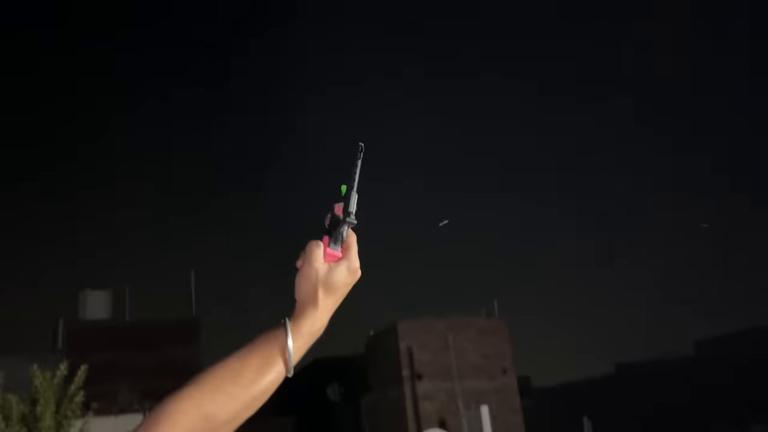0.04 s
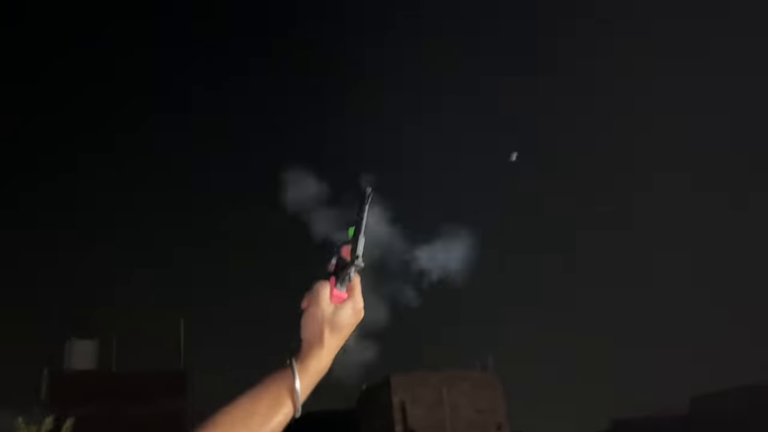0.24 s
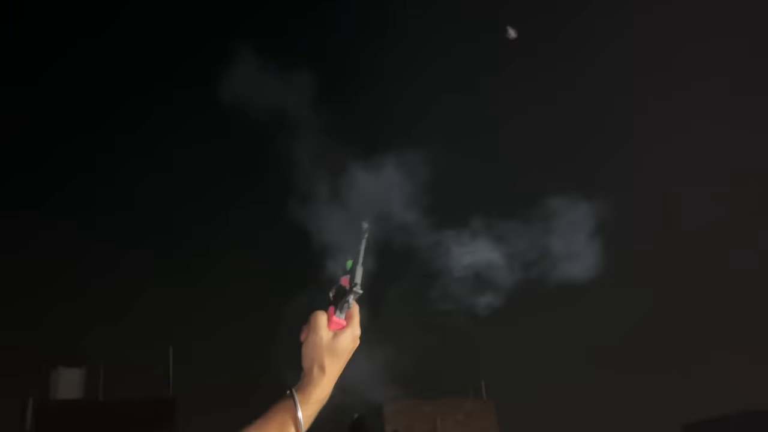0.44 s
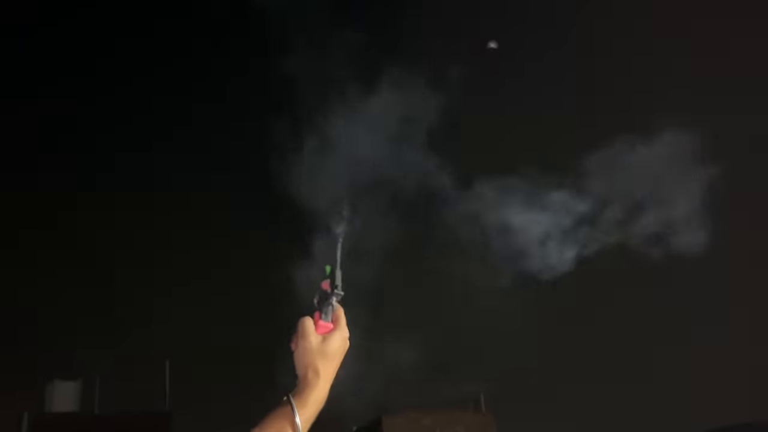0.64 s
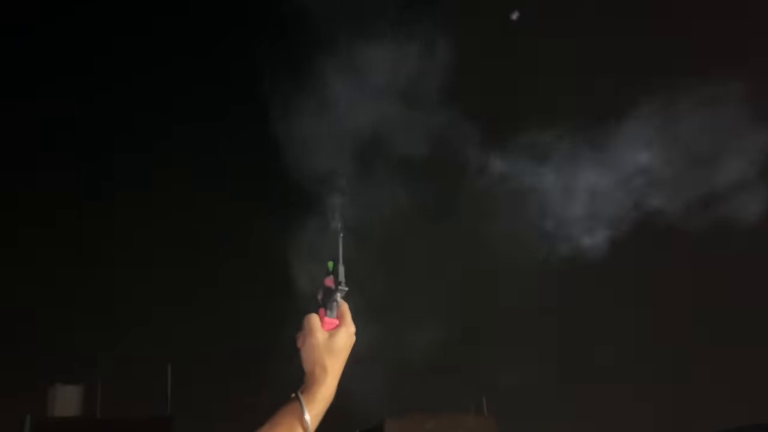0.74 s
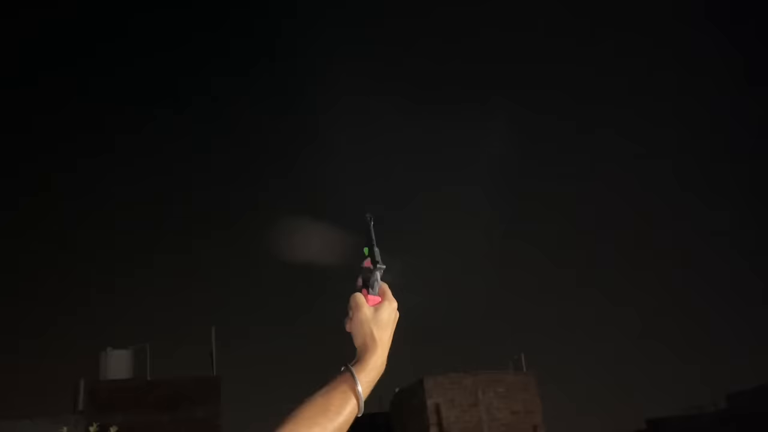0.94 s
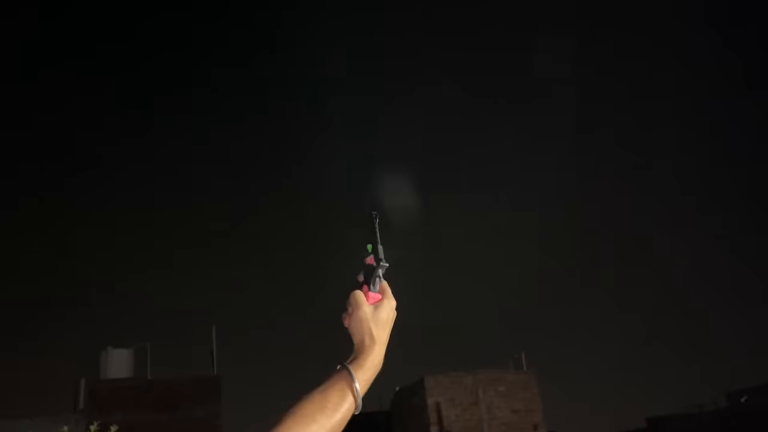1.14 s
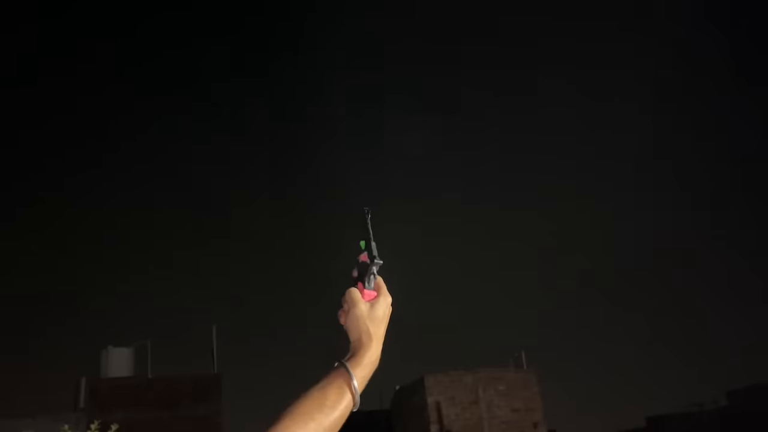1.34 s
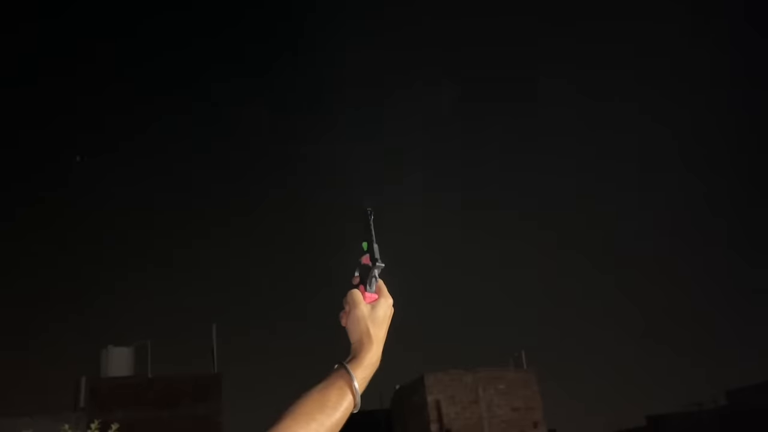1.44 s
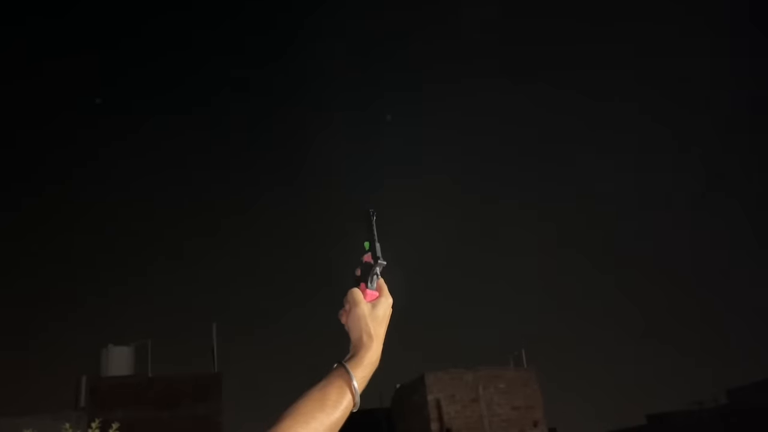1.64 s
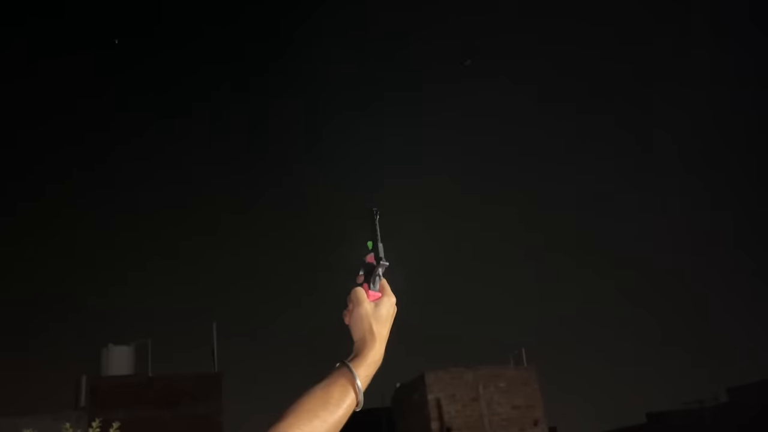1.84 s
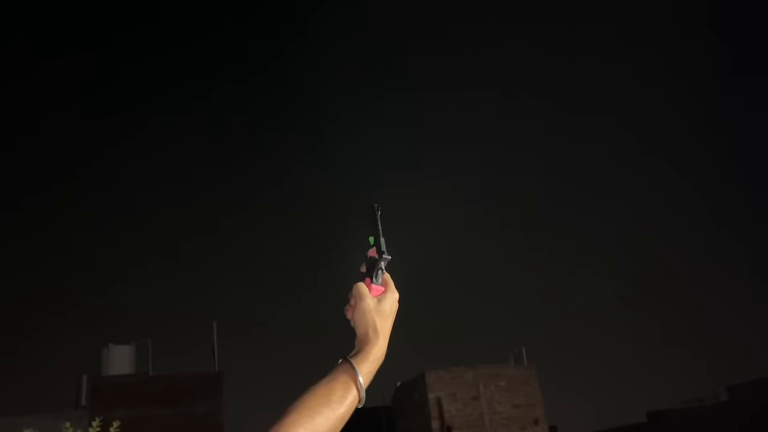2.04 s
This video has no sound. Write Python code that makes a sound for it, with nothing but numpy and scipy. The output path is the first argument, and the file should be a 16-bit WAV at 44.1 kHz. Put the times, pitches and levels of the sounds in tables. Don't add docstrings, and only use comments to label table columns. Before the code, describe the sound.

One sharp cap gun crack echoes off houses, followed by three hard plastic hammer clicks.

```python
import sys
import numpy as np
from scipy import signal
from scipy.fft import rfft, irfft, next_fast_len
from scipy.io import wavfile
from scipy.ndimage import map_coordinates

SR = 44100
rng = np.random.default_rng(int(sys.argv[2]) if len(sys.argv) > 2 else 0)


def elevation(decibels):
    levels = np.asarray(decibels, float)
    return 10 ** (levels / 20)


def output_pcm(signal):
    pcm = np.clip(np.atleast_2d(signal).T, -1, 1) * 32767
    wavfile.write(sys.argv[1], SR, np.round(pcm).astype(np.int16))


N = 92610


def along(points, hz):
    f, v = np.transpose(points)
    return np.interp(np.log(hz + 1), np.log(f + 1), v)


def level(rows):
    s, db = np.transpose(rows)
    return elevation(np.interp(np.arange(N) / SR, s, db))


def unit(x):
    return x / np.sqrt(np.mean(x ** 2) + 1e-20)


def wobble(rate):
    knots = rng.standard_normal(int(N * rate / SR) + 4)
    return map_coordinates(knots, [np.arange(N) * rate / SR])


def filtered(x, response):
    m = next_fast_len(len(x) + 4096)
    return irfft(rfft(x, m) * response(np.fft.rfftfreq(m, 1 / SR)), m)[:len(x)]


def butter(x, hz, kind, order):
    sos = signal.butter(order, min(hz, SR * .49), kind, fs=SR, output='sos')
    return signal.sosfilt(sos, x)


def body(peaks):
    def response(f):
        return sum((-1) ** k * elevation(db) * 1j * f * w / (c * c - f * f + 1j * f * w)
                   for k, (c, w, db) in enumerate(peaks))
    return response


def noise(spectrum):
    return unit(filtered(rng.standard_normal(N), lambda hz: elevation(along(spectrum, hz))))


def blows(rows, peaks):
    x = np.zeros(N)
    for s, db in rows:
        x[round(s * SR)] = elevation(db)
    one_blow = filtered(np.eye(1, 2048)[0], body(peaks))
    return filtered(x, body(peaks)) / np.abs(one_blow).max()


def snaps(rows, wide, air_db, air_hz, lead):
    out, t = np.zeros(N + SR), np.arange(SR // 20) / SR
    for s, db, hz, t60 in rows:
        uneven_decay = elevation(2.05 * rng.standard_normal(len(t)) - 60 * t / t60)
        raw = rng.standard_normal(len(t)) * uneven_decay
        raw[0] = lead
        band = body([(hz, wide * hz, 0)])

        def colour(f):
            air = 1j * f / (900 + 1j * f) / (1 + 1j * f / air_hz) ** 3
            return band(f) ** 2 + elevation(air_db) * air
        x = filtered(raw, colour)
        out[round(s * SR):][:len(t)] += elevation(db) * x / np.abs(x).max()
    return out[:N]


def roof(x):
    # (frequency [Hz], t60 [s])
    roof_t60 = [(600, 0.28), (2000, 0.53), (5000, 0.54), (9000, 0.49), (12000, 0.21), (16000, 0.22)]
    hz, t, z = signal.stft(rng.standard_normal(SR), SR, nperseg=256)
    dying = z * elevation(-60 * t / along(roof_t60, hz)[:, None])
    tail = signal.istft(dying, SR, nperseg=256)[1]
    return signal.fftconvolve(np.pad(x, (300, 0)), tail / np.linalg.norm(tail))[:N]


def street():
    # (frequency [Hz], density [dB per Hz])
    traffic_colour = [(25, -16.5), (60, 0.5), (140, -3.5), (300, -9), (1000, -14.5), (2200, -25),
                      (3400, -30), (6000, -59), (12000, -60.5), (16000, -102.5)]
    # (frequency [Hz], level [dB])
    engine = [(58, -57.5), (118, -63.5), (178, -71)]
    # (time [s], level [dB])
    rustle_level = [(0, -41), (.03, -50), (.06, -57.5), (.11, -49.5), (.15, -59), (.19, -63.5),
                    (.25, -91.5)]
    # (frequency [Hz], density [dB per Hz])
    rustle_colour = [(240, -40.5), (400, -5.5), (504, -17), (1380, -10), (2050, -11.5), (2710, -12.5),
                     (9470, -21), (16000, -34.5)]
    # (time [s], level [dB])
    insect_level = [(0, -65.5), (.95, -68), (1.15, -67), (1.25, -70), (1.42, -59), (1.6, -69.5),
                    (1.75, -69.5), (2.1, -74)]
    # (time [s], level [dB])
    whine_level = [(0, -93), (1.8, -75), (1.95, -61), (2.1, -61)]
    insect_hz, whine_hz = 3160, 905
    t = np.arange(N) / SR
    traffic = elevation(-51 + 1.97 * wobble(7.11)) * noise(traffic_colour)
    hum = np.zeros(N)
    for hz, db in engine:
        loudness = elevation(db + 4.6 * wobble(10.98)) * np.sqrt(2)
        hum += loudness * np.sin(2 * np.pi * hz * t + 1.9 * wobble(6.7))
    rustle = noise(rustle_colour) * level(rustle_level) * elevation(1.2 * wobble(53))
    insect = level(insect_level) * elevation(1.9 * wobble(7.9))
    insect = insect * np.sin(2 * np.pi * insect_hz * t + .6 * wobble(37))
    whine = level(whine_level) * np.sin(2 * np.pi * whine_hz * t + .8 * wobble(21))
    return traffic + hum + rustle + insect + whine


def trigger():
    # (time [s], peak [dB], centre [Hz], t60 [s])
    clicks = [
        (1.1699, -22.5, 5500, 0.012),
        (1.398, -39.5, 6940, 0.052),
        (1.5975, -16, 5100, 0.011),
        (1.617, -37, 5800, .015),
        (1.7774, -40, 5960, 0.07),
        (1.9784, -17.5, 4940, 0.01),
    ]
    # (frequency [Hz], width [Hz], level [dB])
    latch = [(1110, 400, 0), (2930, 280, -9.5), (3970, 300, 0.5), (5800, 460, 5), (10130, 350, -7)]
    # (time [s], peak [dB], centre [Hz], t60 [s])
    spring_ticks = [(1.119, -39, 2150, 0.02), (1.1385, -35, 3460, .015), (1.161, -30, 3500, 0.012),
                    (1.165, -40, 5000, .02), (1.188, -38, 5850, 0.02), (1.2, -42, 8000, .02),
                    (1.3285, -48, 2600, 0.016), (1.59, -34, 3500, 0.051), (1.593, -40, 6500, 0.017),
                    (1.63, -43, 5500, .02), (1.652, -44, 8000, 0.0147), (1.7201, -35.5, 3180, 0.024),
                    (1.971, -29.5, 3350, 0.025), (1.998, -39, 4000, 0.024), (2.031, -44, 7050, 0.011),
                    (2.0468, -39.5, 2870, .02)]
    snap = snaps(clicks, wide=1.1, air_db=6.5, air_hz=16000, lead=1.24)
    ring = filtered(snap, body(latch))
    release = butter(elevation(-4.5) * snap + elevation(1.5) * ring, 1900, 'high', order=3)
    springs = snaps(spring_ticks, wide=0.54, air_db=-28, air_hz=9000, lead=1.5)
    x = release + butter(springs, 8300, 'low', order=5)
    return x + elevation(-19) * roof(x)


def wall_return():
    # (time [s], peak [dB])
    returns = [
        (1.0887, -28),
        (1.5347, -25),
        (1.9095, -29),
    ]
    # (frequency [Hz], width [Hz], level [dB])
    return_peaks = [(2220, 310, 4.5), (1120, 290, -7), (4670, 450, -2.5)]
    contacts = ((0, -4.5), (.0009, 3), (.003, -8))  # (delay [s], level [dB])
    rows = [(s + delay, db + k) for s, db in returns for delay, k in contacts]
    return butter(blows(rows, return_peaks), 7100, 'low', order=5)


def hammer():
    # (time [s], level [dB])
    falls = [
        (0.9642, -6),
        (1.4167, -4),
        (1.796, -4),
    ]
    # (time after the fall [s], level [dB], centre [Hz], t60 [s])
    contacts = [(-.002, -19, 5600, 0.02), (0, -2, 3750, 0.025), (.0011, -7, 4100, 0.014),
                (.0036, 1.5, 5080, 0.01), (.0047, -4.5, 5070, 0.011), (.0060, -1, 3500, 0.0062),
                (.0098, -9.5, 2600, 0.022), (0.0128, -13.5, 4530, 0.029), (0.0225, -9.5, 2640, 0.038),
                (0.024, -11, 5200, 0.039), (.029, -19, 3000, .028), (0.033, -13, 5050, .02),
                (.035, -15.5, 8330, 0.021), (.0365, -21.5, 3500, 0.023), (.065, -23.5, 4960, .025)]
    # (time after the fall [s], level [dB], centre [Hz], t60 [s])
    far_wall = [(0.122, -35.5, 3500, 0.035), (.127, -29.5, 3500, 0.057), (.131, -35.5, 4970, 0.036),
                (.139, -32.5, 2330, .03), (.155, -35.5, 4000, .02)]
    # (frequency [Hz], width [Hz], level [dB])
    frame = [(604, 190, -12.5), (995, 63, 7), (1260, 184, 4), (2610, 140, 7), (3500, 174, 5.5),
             (4070, 210, 3), (4960, 320, 5.5), (5360, 130, 3.5), (5896, 160, 3), (7210, 240, 3),
             (8420, 840, -5), (11000, 460, -5.5)]
    # (frequency [Hz], width [Hz], level [dB])
    roof_colour = [(2600, 230, 8), (3500, 910, 2.5), (3480, 83, 12.5), (4910, 166, 7), (7500, 9100, -0.5)]
    scene_change_s = .9735
    out = np.zeros(N)
    for s, db in falls:
        rows = [(s + delay, db + k + rng.normal(0, 1.1), hz, t60)
                for delay, k, hz, t60 in contacts + far_wall]
        near, late = rows[:len(contacts)], rows[len(contacts):]
        grit = butter(snaps(near, wide=0.61, air_db=-9.0, air_hz=26400, lead=0.45), 1050, 'high', order=2)
        wall = butter(snaps(late, wide=1.0, air_db=-38, air_hz=8000, lead=.6), 11000, 'low', order=6)
        struck = blows([(t, k + 1) for t, k, *_ in near[:6]], frame)
        ring = struck + elevation(-9) * filtered(grit, body(frame))
        tail = roof(blows([(s, db - 5)], roof_colour))
        out += butter(elevation(-1.5) * grit + wall + ring + tail, 555, 'high', order=3)
    return out * (np.arange(N) > scene_change_s * SR)


def echo_field():
    # (time [s], level [dB])
    field_level = [(.215, -27.5), (.221, -5.5), (.232, -15), (.26, -17), (.3, -19), (.4, -25.5),
                   (.47, -26.5), (.55, -28.5), (.7, -38.5), (.95, -53)]
    # (frequency [Hz], density [dB per Hz])
    field_colour = [(120, -81.5), (200, -26), (491, -8), (635, -10), (1300, -1), (1400, 0.5), (3690, -2.5),
                    (9750, -15), (16000, -36.5)]
    # (frequency [Hz], loss [dB per s])
    air_loss = [(300, 2), (2000, 4.5), (5000, 7.5), (8000, 21), (11000, 38.5), (16000, 90.5)]
    hz, frame_s, z = signal.stft(noise(field_colour), SR, nperseg=256)
    dulled = z * elevation(-along(air_loss, hz)[:, None] * np.clip(frame_s - .3, -.1, None))
    field = signal.istft(dulled, SR, nperseg=256)[1][:N] * level(field_level)
    begun = np.arange(N) / SR > field_level[0][0]
    return field * begun * elevation(2.0 * wobble(90) + 1.0 * wobble(27))


def house_echoes():
    # (time [s], peak [dB], centre [Hz], t60 [s])
    houses = [(.2795, -5, 2290, .012), (.317, -6, 4970, 0.0065), (.33, -8, 3500, .008),
              (.3411, -4, 3500, 0.011), (.3655, -13.5, 3500, 0.0091), (.394, -21, 7000, 0.0068),
              (.4298, -4.5, 2670, 0.0068), (.447, -17, 5800, .01), (.511, -21, 7000, .01),
              (.522, -22, 5000, 0.0078), (.5447, -17, 6550, 0.0056), (.557, -20, 4000, 0.0066),
              (.575, -23, 5000, 0.0071), (.549, -23, 6130, 0.0086), (.632, -25.5, 3500, .012),
              (.636, -30.5, 8000, 0.007), (.668, -27, 3000, 0.011), (.715, -34, 5060, .01),
              (.83, -45.5, 7500, 0.0096)]
    return butter(snaps(houses, wide=0.71, air_db=-23, air_hz=9000, lead=3.6), 10200, 'low', order=6)


def chamber():
    # (time [s], level [dB])
    swell_level = [(.192, -43.5), (.201, -34.5), (.204, -24), (.208, -25), (.2098, -32.5), (.2125, -31),
                   (.2140, -6.5), (.2162, -2), (.2180, -32.5)]
    # (time [s], peak [dB])
    ring_pulses = [
        (.1985, -31),
        (.2034, -6.5),
        (.2050, -11.5),
        (.2072, -20),
        (.2098, -6),
        (.2112, -10.5),
        (.2138, -6.5),
        (.2152, -8.5),
        (.2174, -6.5),
    ]
    # (frequency [Hz], width [Hz], level [dB])
    chamber_peaks = [(330, 90, -6), (530, 110, -4), (735, 80, 0), (995, 70, 0), (1188, 60, 0),
                     (1710, 80, 3), (1927, 90, 3), (2105, 80, 1), (2410, 90, -4), (2530, 90, -6),
                     (3157, 60, 3)]
    t = np.arange(N) / SR
    sounding = (t > swell_level[0][0]) * (t < swell_level[-1][0])
    swell = level(swell_level) * sounding * rng.standard_normal(N)
    ring = filtered(swell, lambda f: body(chamber_peaks)(f) / (1 + (f / 3700) ** 8))
    return ring * elevation(14.5) + butter(blows(ring_pulses, chamber_peaks), 3800, 'low', order=6)


def blast_push():
    thump_s, thump_db, thump_len_s = .2175, -12.5, 0.00036
    swing_s, swing_db, swing_t60_s = .2186, -9, 0.089
    from_hz, to_hz, fall_s = 418, 46.5, 0.0068
    t = np.arange(N) / SR
    u = np.clip(t - thump_s, 0, None) / thump_len_s
    thump = elevation(thump_db) * (u * (2 - u) * np.exp(-u) + 1.2 * u / 1.7 * np.exp(-u / 3.0))
    u = np.clip(t - swing_s, 0, None)
    turns = to_hz * u + from_hz * fall_s * (1 - np.exp(-u / fall_s))
    return thump + elevation(swing_db - 60 * u / swing_t60_s) * np.sin(2 * np.pi * turns)


def cracks():
    # (time [s], peak [dB], centre [Hz], t60 [s])
    shocks = [(.196, -28.5, 5030, .006), (.1975, -27.5, 3980, 0.0094), (.2034, -26, 6900, 0.0054),
              (.207, -30, 9000, 0.02), (.2135, -14, 5750, 0.019), (.2173, -8, 6620, 0.0075),
              (.2249, -2, 4950, 0.0066), (.236, 2.5, 2650, 0.0022), (.2368, 9.5, 2870, 0.0046),
              (.243, 4, 2500, 0.0072), (.246, -3.5, 3030, .008), (.2489, 6, 7500, 0.0048),
              (.2635, 0.5, 3000, .01)]
    return snaps(shocks, wide=0.68, air_db=-8.5, air_hz=31100, lead=4.6)


def cap():
    return echo_field() + house_echoes() + chamber() + blast_push() + cracks()


def scene():
    return (street() + trigger() + wall_return() + hammer() + cap())[None]


def low_pass(x):
    return signal.sosfilt(signal.butter(12, 16990, fs=SR, output="sos"), x)


def record(dry):
    # (time [s], level [dB])
    gain = [(0, 1.5), (.2183, 1.5), (.2195, -11), (.3, -22), (.45, -14.5), (.6, -10), (.8, -7.5),
            (.945, -5.5), (.96, -13), (.972, -35), (.976, -18.5), (.986, -7.5), (1.0, 0), (1.03, -1),
            (1.15, -2.5), (2.1, -0.5)]
    ceiling, top_hz = .9, 15850
    x = butter(dry[0] * level(gain), 48, 'high', order=4)
    x = x / (1 + np.abs(x / ceiling) ** 10) ** (1 / 10)
    x = filtered(x, lambda hz: elevation(-30 / (1 + np.exp(np.clip((top_hz - hz) / 40, -20, 20)))))
    return low_pass(x[None])


dry = scene()
out = record(dry)
output_pcm(out)
```